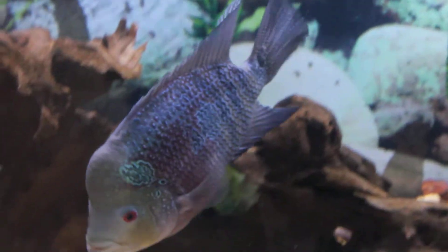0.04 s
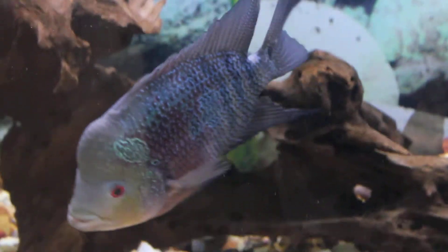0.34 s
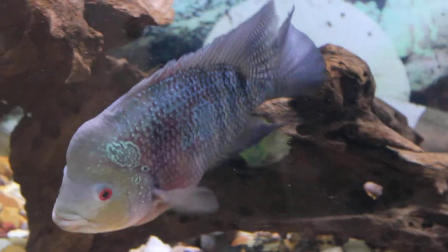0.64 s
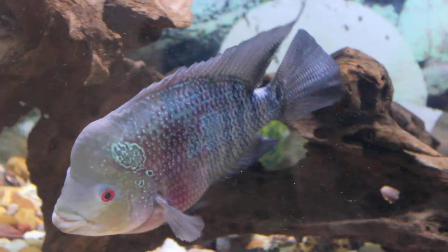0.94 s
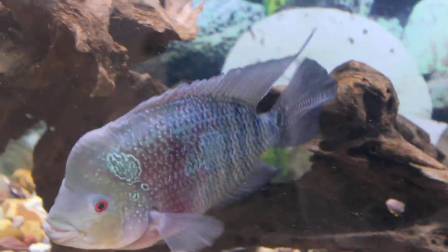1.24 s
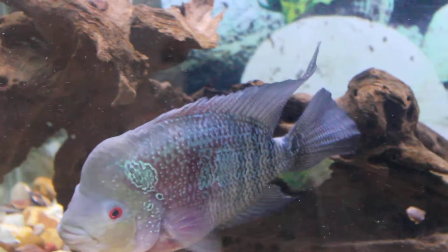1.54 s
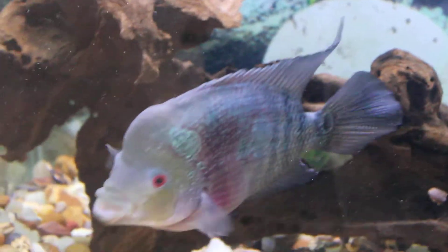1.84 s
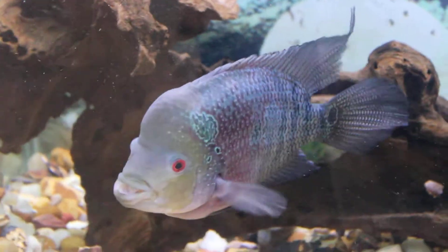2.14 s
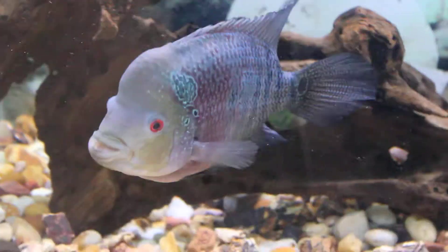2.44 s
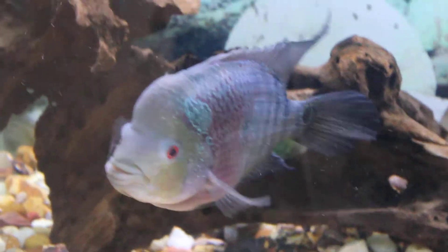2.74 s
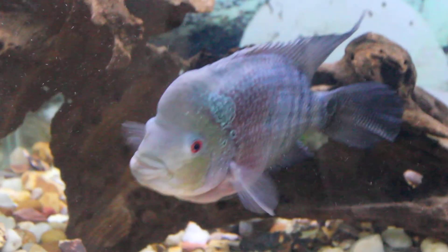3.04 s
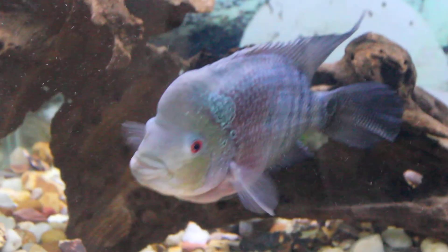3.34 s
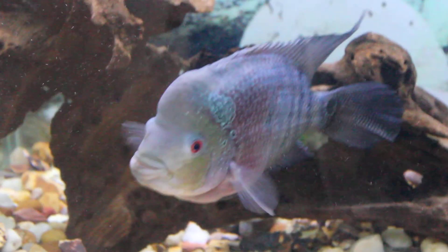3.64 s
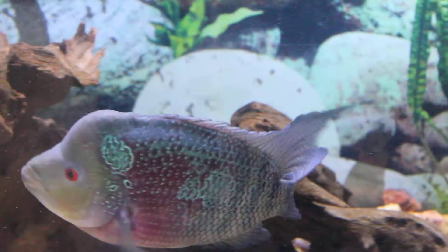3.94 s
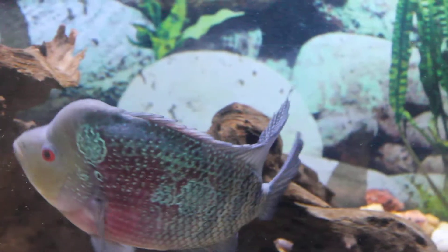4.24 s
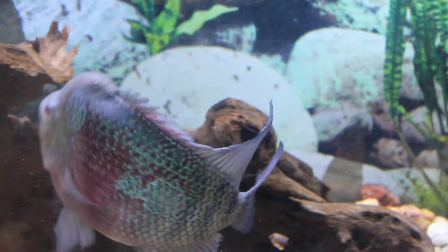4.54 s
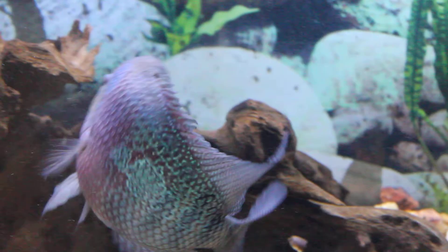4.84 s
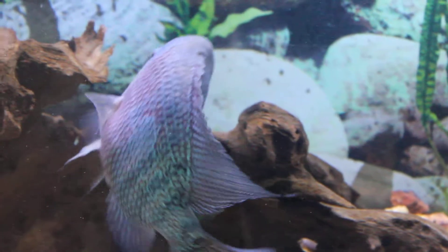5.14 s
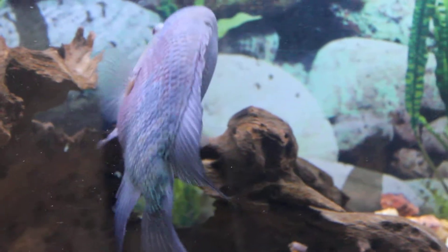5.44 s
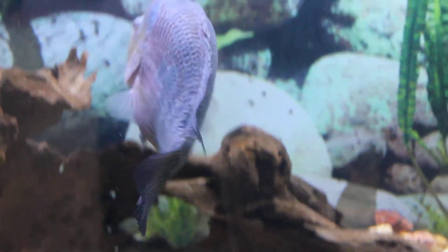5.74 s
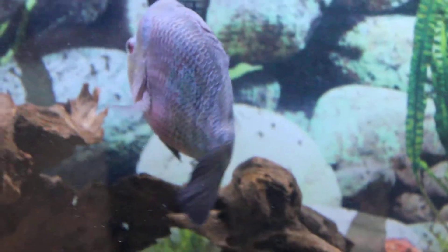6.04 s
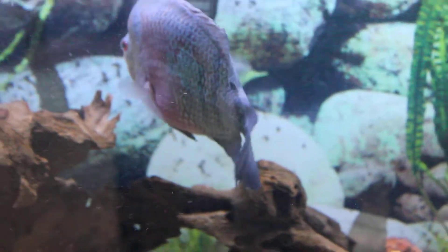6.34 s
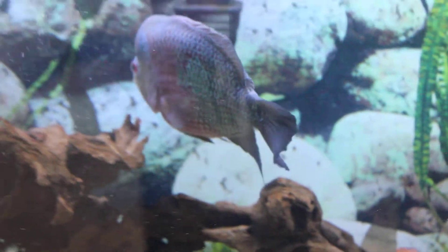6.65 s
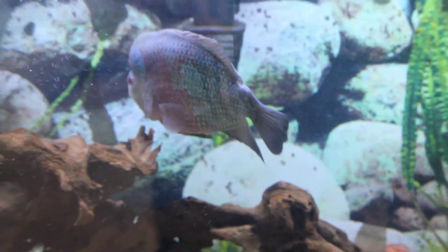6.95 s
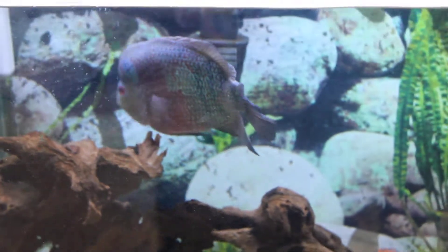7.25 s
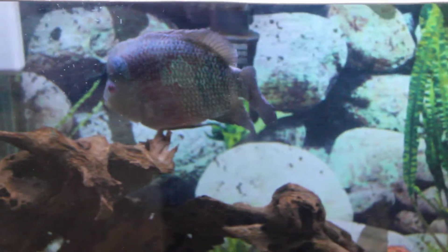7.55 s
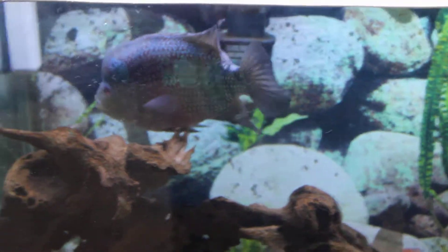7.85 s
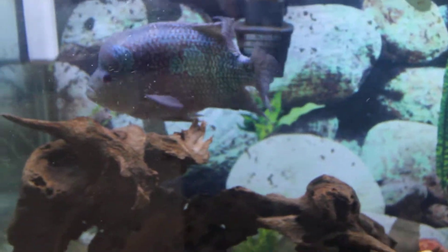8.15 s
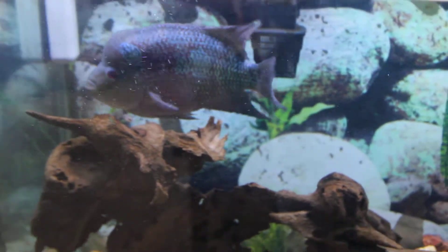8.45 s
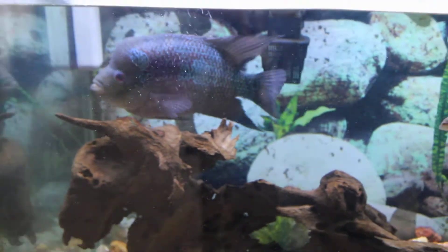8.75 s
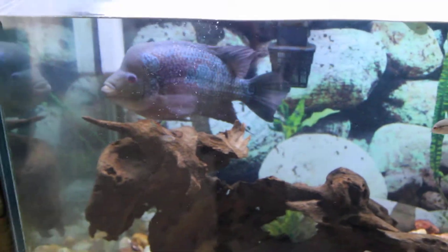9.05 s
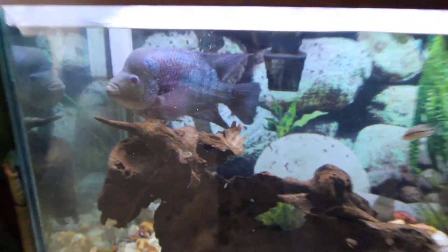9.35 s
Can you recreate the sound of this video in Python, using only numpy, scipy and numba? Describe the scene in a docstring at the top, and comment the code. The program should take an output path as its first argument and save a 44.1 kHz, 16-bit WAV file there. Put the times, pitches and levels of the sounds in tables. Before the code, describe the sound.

Close to an indoor aquarium, a steady trickle bubbles, gurgles and plinks while pump motors hum faintly underneath. About three seconds in, one hard drip snaps, followed by a quick burst of dry crackling and a dead silence of under a second. The trickle and hum come back abruptly and continue to the end with more plinks and small, bright sprays.

```python
"""A filter outlet trickles into a fish tank in a small room, over two pump motors that beat together.
From the start, trapped air rings as a dense fizz of tiny bubbles, low glugs and clear plinks.
Close drops snap and knock on the tank, the hardest at 2.8 s. Right after it the sound breaks up
into dry crackles and drops out for most of a second. At 3.9 s water and pumps are back, and they
run on to the end with more plinks and bright bursts of spray."""
import sys
import numpy as np
from scipy import signal
from scipy.io import wavfile
from numba import njit

SR = 44100
rng = np.random.default_rng(int(sys.argv[2]) if len(sys.argv) > 2 else 0)


def log_audio(samples):
    """Write samples as a 16-bit WAV file to the path given in sys.argv[1]."""
    # one column per channel
    frames = np.atleast_2d(samples).T
    # limit to full scale, then quantise
    limited = np.clip(frames, -1, 1)
    pcm = np.round(limited * 32767).astype(np.int16)
    wavfile.write(sys.argv[1], SR, pcm)


N = 414099

# The pump motors. Each row: hum pitch in Hz, then levels in dB of harmonics one, two and three.
PUMP_MOTORS = [(116.96, -55, -54, -70), (120.03, -57, -60, -60)]
# The tone of the rumble under the pumps. Each row: frequency in Hz, relative spectral level in dB.
RUMBLE_SPECTRUM = [(25, -13.5), (45, -15.5), (72, -28.5), (87, 1), (110, -3), (168, 2), (210, -7.5),
                   (400, -13.5)]
# The stream swells and eases. Each row: time in seconds, lift of large bubbles in dB, of small ones in dB.
FLOW_SWELLS = [(0.0, 2, 0), (0.36, 3, -0.5), (0.64, -1, -1), (1.001, 0, 2), (1.68, 0.5, -1),
               (1.999, -3, -2), (2.2, 2, 1.5), (2.721, -1.0, -1), (4.32, 0, -0.5), (4.399, -3.5, 1),
               (5.24, 0, 0.5), (7.28, 0, 0.0), (7.399, 3, 1.5), (7.6, -1, 0.5), (7.76, 2, 2.5),
               (8.08, -3.5, 0), (8.401, 0.5, 1.5), (9.359, 0, 0)]
# The tone of the falling water. Each row: frequency in Hz, relative spectral level in dB.
WATER_SPECTRUM = [(130, -35), (220, -10.5), (298, -6), (456, -11.5), (607, -4), (663, -11), (867, -9),
                  (1190, -10), (1640, -13), (1970, -12), (2610, -13), (3940, -14), (4540, -19.5),
                  (10100, -28.5), (15500, -38)]
# Resonances of the glass tank and the air over the water.
# Each row: centre in Hz, width in Hz, send level in dB.
TANK_RESONANCES = [(259, 14, -4), (303, 11, -2), (370, 23, -5), (614, 33, 0.5), (754, 32, -0.5),
                   (963, 27, -7.5), (1175, 90, -6), (6050, 550, -9.5)]
# Gulps of air dragged under by the stream. Each row: start in seconds, relative level in dB, pitch in Hz.
BIG_GLUGS = [(0.058, -25, 640), (0.19, -23.5, 603), (0.39, -23, 370), (0.44, -27, 640), (0.876, -31, 616),
             (1.092, -29, 614), (1.158, -28, 580), (1.207, -26, 611), (1.291, -27.5, 624),
             (1.624, -21.5, 624), (1.675, -23.5, 620), (1.893, -26.5, 606), (2.058, -25, 620),
             (2.207, -23, 283), (2.389, -25.5, 614), (2.475, -27, 726), (2.576, -23, 613),
             (2.658, -23, 607), (4.048, -26, 710), (4.115, -26.5, 605), (4.314, -25.5, 600),
             (4.563, -25, 576), (4.629, -24.5, 690), (4.947, -23.5, 616), (5.235, -26, 610),
             (5.297, -26.5, 614), (5.412, -26.5, 750), (5.488, -24.5, 590), (5.53, -24, 604),
             (5.764, -28, 607), (5.896, -20, 264), (5.947, -27, 600), (6.431, -25, 600),
             (6.595, -26.5, 610), (6.68, -24.5, 590), (6.779, -26.5, 643), (7.424, -24, 282),
             (7.481, -26.5, 590), (7.697, -26.5, 614), (7.83, -25, 625), (7.912, -26, 600),
             (8.196, -24, 614), (8.363, -25.5, 614), (8.558, -25.5, 614), (8.713, -24, 606),
             (8.808, -24.5, 720), (8.939, -25, 600)]
# The loudest clear bubbles. Each row: start in seconds, relative level in dB, pitch in Hz.
CLOSE_PLINKS = [(0.238, -22, 1910), (0.339, -28, 1225), (0.453, -22, 2000), (1.024, -26, 4250),
                (1.086, -24, 3450), (1.373, -28, 4350), (1.456, -27, 3360), (1.629, -22, 4000),
                (1.863, -27, 4980), (2.027, -33, 1134), (2.61, -28, 857), (2.639, -28, 1400),
                (2.676, -28, 6350), (4.034, -24, 5520), (4.172, -21, 3510), (4.244, -30, 3990),
                (4.555, -27, 2000), (4.623, -24, 5400), (4.76, -25, 1860), (4.972, -27, 2730),
                (5.228, -26, 4070), (5.815, -30, 1230), (6.171, -25.5, 1222), (6.358, -29.5, 2820),
                (6.657, -24.5, 3000), (6.786, -28, 2760), (6.888, -27, 2730), (6.959, -25.5, 2830),
                (7.078, -28.5, 2940), (7.125, -26.5, 1194), (7.204, -29.5, 2014), (7.448, -22, 3420),
                (7.698, -24, 1313), (8.3, -20.5, 3860), (8.33, -29, 1945), (8.432, -26, 1340),
                (8.665, -32, 2210)]
# Favoured sizes of the softer clear bubbles. Each row: typical pitch in Hz, typical relative level in dB.
FAR_PLINK_SIZES = [(1200, -36.5), (2000, -41.5)]
# Drops that land close by. Each row: start in seconds, snap gain in dB, pitch in Hz, knock gain in dB.
CLOSE_DROPS = [(0.3068, -15.5, 1480, -24), (1.188, -22, 6700, -49), (2.827, -19, 1900, -42.5),
               (2.8445, 1.5, 1860, -31.5)]
# The ring of a snap. Each row: multiple of its pitch, relative level in dB, seconds to fade by 60 dB.
SNAP_PARTIALS = [(.87, -10, .03), (1.05, 1, 0.0099), (1.19, -9, .013), (2.5, -18.5, 0.0089),
                 (3.55, -10, 0.0044), (4.801, -14, 0.0053)]
# The loudest sprays of small bubbles. Each row: start in seconds, relative level in dB, pitch in Hz.
BIG_SPRAYS = [(1.672, -28, 9400), (2.208, -32, 7350), (3.975, -25, 10700), (4.277, -31.5, 6400),
              (5.008, -32, 8750), (5.831, -32, 3560), (5.872, -32, 4050), (5.97, -31.5, 8600),
              (6.026, -33, 10500), (6.055, -33.5, 5700), (6.085, -33.5, 4500), (6.285, -32, 10100),
              (7.355, -32.5, 6350), (7.497, -31.5, 8800), (7.874, -30.5, 3920), (7.875, -28, 13400),
              (8.084, -30.5, 4000), (8.453, -29, 4020), (8.764, -31.5, 10300)]
# Crackles as the sound breaks up.
# Each row: start in seconds, relative level in dB, band position in Hz, seconds to fade by 60 dB.
BREAKUP_CRACKLES = [(2.9, -13.5, 2640, 0.025), (2.924, -9, 5560, 0.027), (2.945, -11, 3100, 0.015),
                    (2.9755, -12.5, 4580, 0.014), (3.0046, -5, 5500, 0.0088), (3.025, -19, 5930, 0.036),
                    (3.074, -22, 3000, 0.027), (3.081, -15.5, 4650, 0.017), (3.0904, -9.5, 4250, 0.026)]
# Dead silences. Each row: start in seconds, end in seconds.
DROPOUTS = [(2.903, 2.924), (3.112, 3.924)]

PLACES = 10   # spots on the water, each with its own reflections
BREAKUP_S, CUTOFF_HZ = 2.903, 15900
TIME = np.arange(N) / SR


def from_db(db):
    """Decibels to gain."""
    return 10 ** (np.asarray(db) / 20)


def unit_rms(x):
    """Scale to unit power."""
    return x / np.sqrt(np.mean(x ** 2) + 1e-20)


def level_at(spectrum, hz):
    """Read a spectrum on a log-frequency axis."""
    points_hz, points_db = np.transpose(spectrum)
    return np.interp(np.log(hz), np.log(points_hz), points_db)


def butter(x, hz, kind, order=2):
    """Causal Butterworth filter."""
    sos = signal.butter(order, np.clip(hz, 10, .47 * SR), kind, fs=SR, output="sos")
    return signal.sosfilt(sos, x)


def add(out, s, sound):
    """Mix a short sound in at s seconds."""
    i = round(s * SR)
    out[i:i + len(sound)] += sound[:N - i]


def room(places, wet_db, tank_db, tank_t60=0.076, room_t60=0.18):
    """Each place gets its own quick reflections between glass and lid, plus a room tail, at equal power."""
    t = np.arange(SR // 4) / SR

    def tail(t60):
        noise = rng.standard_normal((len(places), len(t)))
        return unit_rms(noise * from_db(-60 * t / t60)) / np.sqrt(len(t))

    response = from_db(tank_db) * tail(tank_t60) + from_db(wet_db) * tail(room_t60) + (t == 0)
    response /= np.linalg.norm(response, axis=1, keepdims=True)
    return signal.oaconvolve(places.astype("f"), response.astype("f"), axes=1).sum(0)[:N]


def pumps(rumble_db=-52, wobble_db=-67, in_step_s=.111):
    """Two motors at nearly the same speed throb three times a second over a low rumble."""
    t = TIME - in_step_s
    hum = sum(np.sqrt(2) * from_db(db) * np.sin(2 * np.pi * k * hz * t)
              for hz, *levels in PUMP_MOTORS for k, db in enumerate(levels, 1))
    wobble = from_db(wobble_db) * np.sin(np.pi * PUMP_MOTORS[0][0] * t)   # one rotor is out of balance
    edges_hz = np.geomspace(20, 450, 17)
    rumble = np.zeros(N)
    for low, high in zip(edges_hz, edges_hz[1:]):
        band = butter(rng.standard_normal(N), [low, high], "band")
        rumble += from_db(level_at(RUMBLE_SPECTRUM, np.sqrt(low * high))) * band
    return hum + wobble + from_db(rumble_db) * unit_rms(rumble)


def wander(rate_hz, hop=40):
    """A smooth random drift of unit power, mostly slower than rate_hz."""
    pole = np.exp(-2 * np.pi * rate_hz * hop / SR)
    noise = rng.standard_normal(N // hop + 2002)
    drift = signal.lfilter([1], [1, -2 * pole, pole * pole], noise)[2000:]   # skip the settling
    return np.interp(np.arange(N) / hop, np.arange(len(drift)), unit_rms(drift))


def stream(wander_hz=4.4, large_wander_db=0.5, small_wander_db=0.63):
    """The flow rides the level of large and small bubbles, in dB: slow swells plus a shared waver."""
    times, large_db, small_db = np.transpose(FLOW_SWELLS)
    waver = wander(wander_hz)
    return (np.interp(TIME, times, large_db) + large_wander_db * waver,
            np.interp(TIME, times, small_db) + small_wander_db * waver)


def flow_db(flow, s, hz):
    """How far the flow lifts bubbles of this pitch above their usual level at s seconds."""
    large_db, small_db = (np.interp(s, TIME, db) for db in flow)
    smallness = np.interp(np.log(hz), np.log([500, 2500]), [0, 1])
    return large_db + (small_db - large_db) * smallness


@njit
def ring_bubbles(shape, place, start, size, phase_step, decay, rise):
    """Each bubble is a dying sine whose pitch rises as it nears the surface."""
    out = np.zeros(shape)
    for b in range(len(start)):
        phase, height = 0., size[b]
        fade, life = np.exp(-decay[b]), int(6 / decay[b])
        for i in range(min(life, shape[1] - start[b])):
            out[place[b], start[b] + i] += height * np.sin(phase)
            phase += phase_step[b] * (1 + rise * i / life)
            height *= fade
    return out


def drops(s, db, hz, cycles, rise=0, bubbles=1, scatter=0, lag_s=0):
    """Each drop traps one bubble at once, any others later, weaker and detuned; one track per place."""
    lateness = rng.exponential(1, (len(s), bubbles)) * (np.arange(bubbles) > 0)
    start = (np.maximum(s[:, None] + lag_s * lateness, 0).ravel() * SR).astype(int)
    polarity = rng.choice([-1, 1], lateness.shape)
    size = (from_db(db)[:, None] * np.exp(-lateness / 2) * polarity).ravel()
    detune = np.exp(scatter * rng.standard_normal(lateness.shape) * (lateness > 0))
    pitch = np.minimum(hz[:, None] * detune, SR / 2).ravel()
    decay = np.log(1000) * pitch / (cycles * SR)   # 60 dB down after so many cycles
    place = rng.integers(0, PLACES, len(start))
    return ring_bubbles((PLACES, N), place, start, size, 2 * np.pi * pitch / SR, decay, float(rise))


def trickle(flow, spread_db=1.72, low_hz=210, count=14000):
    """The water bed: a rain of droplets, many small and a few large, each leaving a swarm of bubbles."""
    s = rng.uniform(0, N / SR, count)
    hz = np.exp(rng.uniform(np.log(220), np.log(CUTOFF_HZ), count))
    size_db = spread_db * np.minimum(rng.exponential(1, count), 4)
    # high bubbles die sooner and lie further apart in pitch, so each must be stronger
    db = level_at(WATER_SPECTRUM, hz) + 20 * np.log10(hz) + size_db + flow_db(flow, s, hz)
    swarm = drops(s, db, hz, cycles=34, rise=0.12, bubbles=5, scatter=0.067, lag_s=.007)
    return unit_rms(butter(room(swarm, wet_db=5.5, tank_db=-8.5), low_hz, "high"))


def fizz(flow, per_s=520, spread_db=6.0, low_hz=2600, top_hz=9000):
    """Bubbles burst at the surface with tiny broadband ticks, many faint and a few sharp."""
    ticks = np.zeros((PLACES, N))
    for track in ticks:
        at = np.flatnonzero(rng.random(N) < per_s / PLACES / SR)
        size_db = spread_db * np.minimum(rng.exponential(1, len(at)), 4)
        track[at] = from_db(size_db) * rng.choice([-1, 1], len(at))
    bright = butter(room(ticks, wet_db=2.5, tank_db=5.5), low_hz, "high")
    return unit_rms(butter(bright, top_hz, "low", order=1)) * from_db(flow_db(flow, TIME, top_hz))


def droplets(gain_db=-47, spread_db=3.0, count=380):
    """Larger drops poke out of the trickle as short, high pings."""
    s = rng.uniform(0, N / SR, count)
    hz = np.exp(rng.uniform(np.log(3400), np.log(13000), count))
    db = gain_db + level_at(WATER_SPECTRUM, hz) + 8 * np.log10(hz)
    db += spread_db * rng.standard_normal(count)
    pings = drops(s, db, hz, cycles=95, rise=0.041, bubbles=4, scatter=0.037, lag_s=.006)
    return room(pings, wet_db=-2.5, tank_db=1.5)


def tank_resonance(x, hz, width_hz):
    """The tank rings along with the water at one pitch: a band-pass with unity gain at its peak."""
    radius = np.exp(-np.pi * width_hz / SR)
    feedback = [1, -2 * radius * np.cos(2 * np.pi * hz / SR), radius ** 2]
    return signal.lfilter(np.array([1, 0, -1]) * (1 - radius ** 2) / 2, feedback, x)


def glugs(flow, big_gain_db=2, soft_db=-34, soft_hz=670, gap_s=.125, low_hz=420, count=90):
    """Big gulps over an uneven run of softer ones: large, quickly damped bubbles, close and dry."""
    run_s = gap_s * (np.arange(count) + rng.random(count))
    run_db = soft_db + 1.5 * np.minimum(rng.standard_normal(count), 1.5) + flow_db(flow, run_s, soft_hz)
    run_hz = soft_hz * np.exp(0.14 * rng.standard_normal(count))
    big = np.array(BIG_GLUGS) + [0, big_gain_db, 0]
    s, db, hz = np.vstack([np.c_[run_s, run_db, run_hz], big]).T
    gulps = drops(s, db, hz, cycles=17, rise=0.6).sum(0)
    return butter(gulps, low_hz, "high", order=3)


def plinks(gain_db=-3.0):
    """The loudest clear bubbles ring close by, on top of the trickle."""
    s, db, hz = np.transpose(CLOSE_PLINKS)
    rings = drops(s, db + gain_db, hz, cycles=100, rise=0.04, bubbles=4, scatter=0.04, lag_s=.009)
    return room(rings, wet_db=-5.0, tank_db=-7.5)


def far_plinks(size_scatter=0.057, spread_db=3.0, count=18):
    """Softer bubbles of the favoured sizes ring at random moments, deeper in the room."""
    usual_hz, usual_db = np.array(FAR_PLINK_SIZES)[np.arange(count) % len(FAR_PLINK_SIZES)].T
    s = rng.uniform(0, N / SR, count)
    db = usual_db + spread_db * rng.standard_normal(count)
    hz = usual_hz * np.exp(size_scatter * rng.standard_normal(count))
    return room(drops(s, db, hz, cycles=78, rise=0.037), wet_db=4.0, tank_db=-0.5)


def snaps(low_hz=1150):
    """A drop lands close by with a hard, quickly damped ring, almost dry."""
    out, t = np.zeros(N), np.arange(SR // 10) / SR
    for s, db, hz, _ in CLOSE_DROPS:
        for multiple, partial_db, t60 in SNAP_PARTIALS:
            add(out, s, from_db(db + partial_db - 60 * t / t60) * np.sin(2 * np.pi * hz * multiple * t))
    return butter(room(out[None], wet_db=-28.5, tank_db=-17.0), low_hz, "high")


def knocks(thud_hz=694, thud_t60=0.027, splash_db=1, splash_t60=0.047, splash_top_hz=4200):
    """Each close drop also knocks on the tank and throws a short, broad splash."""
    out, t = np.zeros(N), np.arange(SR // 10) / SR
    for s, _, _, db in CLOSE_DROPS:
        thud = from_db(-60 * t / thud_t60) * np.sin(2 * np.pi * thud_hz * t)
        noise = unit_rms(butter(rng.standard_normal(len(t)), [thud_hz, splash_top_hz], "band"))
        splash = noise * from_db(splash_db - 60 * t / splash_t60)
        add(out, s, from_db(db) * (thud + splash))
    return out


def sprays(gain_db=1, spread_db=2, low_hz=5000, top_hz=13500, count=60):
    """A burst of spray makes dozens of tiny bubbles; softer bursts fall at random among the big ones."""
    soft_s = rng.uniform(0, N / SR, count)
    soft_db = -39 + spread_db * rng.standard_normal(count)
    soft_hz = rng.uniform(low_hz, top_hz, count)
    s, db, hz = np.vstack([np.c_[soft_s, soft_db, soft_hz], BIG_SPRAYS]).T
    bursts = drops(s, db + gain_db, hz, cycles=55, bubbles=30, scatter=0.08, lag_s=0.012)
    return room(bursts, wet_db=-1.5, tank_db=1.0)


def breakup(gain_db=-6, broad_db=-4, hiss_db=-37.5, low_hz=480, top_hz=9630):
    """The sound breaks up: dry crackles of fast-fading noise over a thin hiss."""
    out, t = np.zeros(N), np.arange(SR // 20) / SR
    for s, db, hz, t60 in BREAKUP_CRACKLES:
        grit = rng.standard_normal(len(t))
        band = unit_rms(butter(grit, [hz / 2.95, hz * 1.33], "band", order=1))
        burst = unit_rms(band + from_db(broad_db) * grit)
        add(out, s, from_db(db + gain_db - 60 * t / t60) * burst)
    hiss = np.interp(TIME, [2.96, 2.975, 3.095, 3.11], [0, 1, 1, 0]) * rng.standard_normal(N)
    thinned = butter(out + from_db(hiss_db) * hiss, low_hz, "high", order=1)
    return butter(thinned, top_hz, "low", order=20)


def scene(trickle_db=-36, fizz_db=-46):
    """The mono mix: water, close drops and pumps, muted from the breakup to the end of the last dropout."""
    flow = stream()
    water = from_db(trickle_db) * trickle(flow) + from_db(fizz_db) * fizz(flow)
    water = water + glugs(flow) + droplets() + plinks() + far_plinks() + sprays()
    tank = sum(from_db(db) * tank_resonance(water, hz, width) for hz, width, db in TANK_RESONANCES)
    close = snaps() + knocks()
    heard = (TIME < BREAKUP_S) | (TIME > DROPOUTS[-1][1])
    return ((water + tank + close + pumps()) * heard + breakup())[None]


def record(dry):
    """The signal cuts out in the dropouts, clips at full scale and loses its very top."""
    live = np.prod([(TIME < start) | (TIME > end) for start, end in DROPOUTS], axis=0)
    steep_lowpass = signal.ellip(10, .1, 70, CUTOFF_HZ, fs=SR, output="sos")
    return signal.sosfilt(steep_lowpass, np.clip(dry * live, -1, 1))


dry = scene()
out = record(dry)
log_audio(out)
```